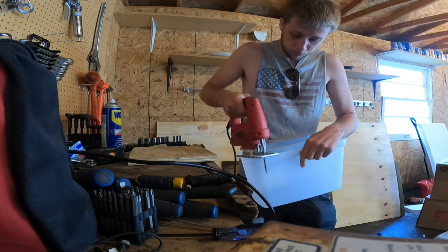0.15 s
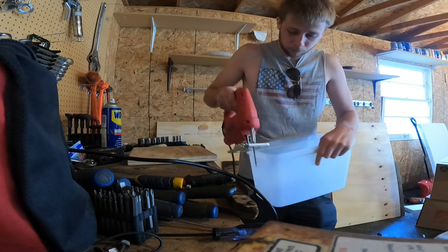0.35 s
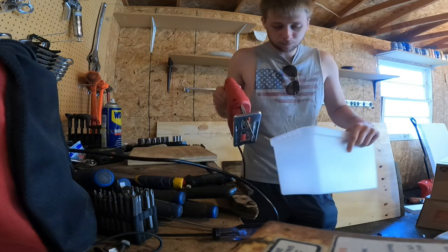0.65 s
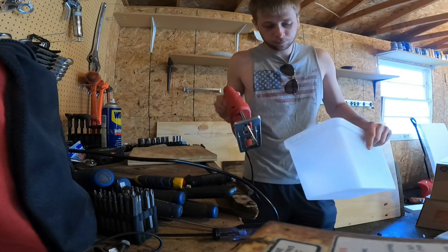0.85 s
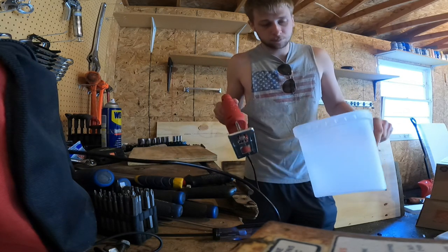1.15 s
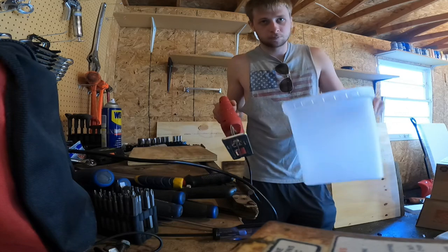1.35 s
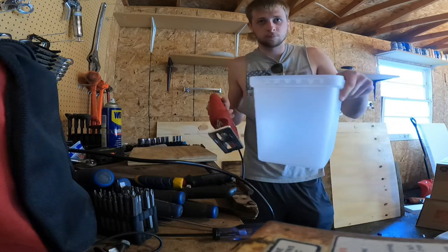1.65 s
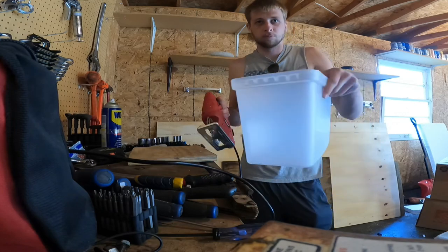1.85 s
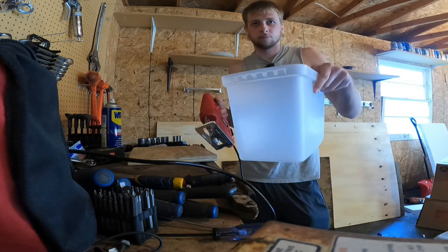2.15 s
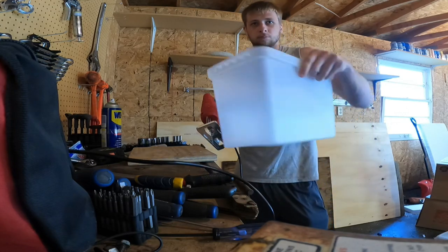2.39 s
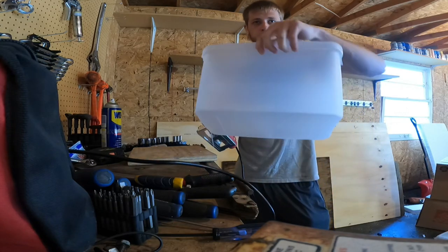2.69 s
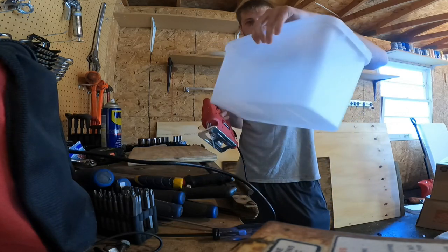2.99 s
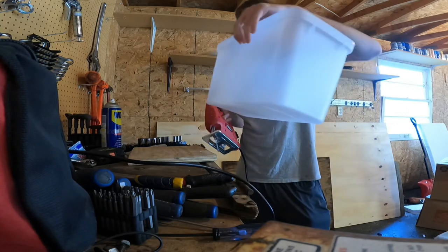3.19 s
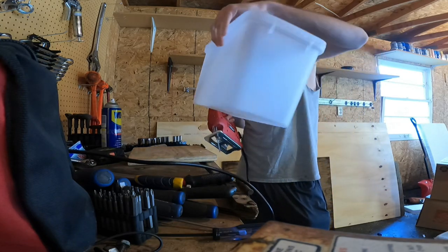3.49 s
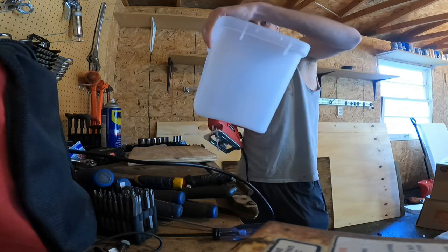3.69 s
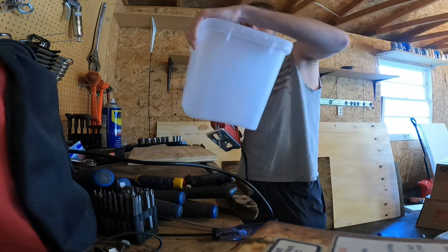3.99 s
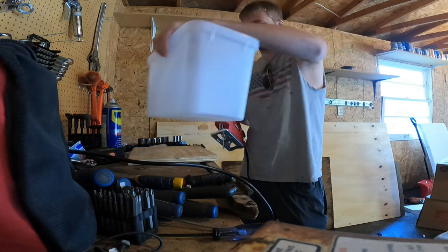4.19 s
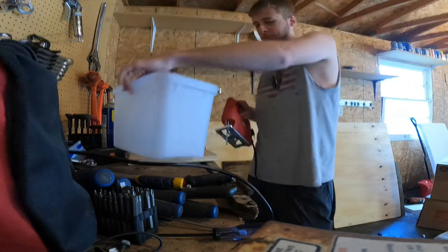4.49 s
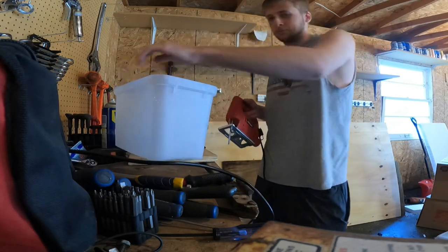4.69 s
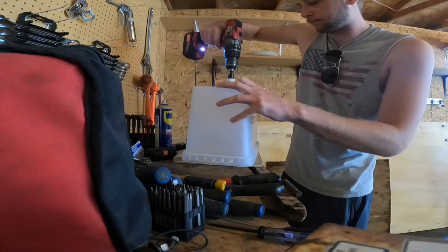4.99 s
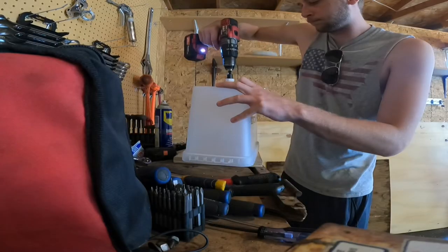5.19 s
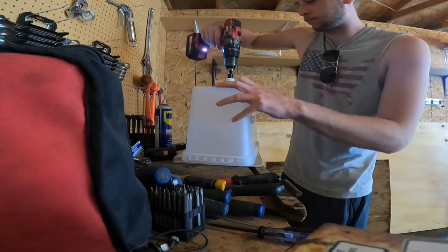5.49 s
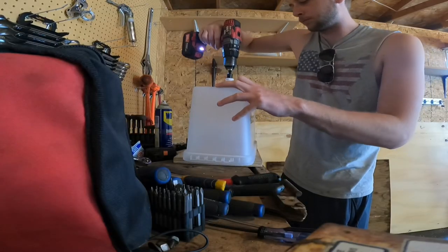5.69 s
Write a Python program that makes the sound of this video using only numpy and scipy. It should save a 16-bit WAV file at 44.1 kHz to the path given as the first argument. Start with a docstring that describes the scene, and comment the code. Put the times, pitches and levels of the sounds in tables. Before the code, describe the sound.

A jigsaw coasts down in a small wooden workshop, heard close in stereo. At 0 s two or three heavy hollow blows drum through a plastic bin as the loud, gritty whirr leaves it. The motor whine slides steadily downward, gear chatter thins and the tone darkens; from roughly 0.8 s loose metallic clacks stand out, slowing to irregular ticks from 1.5 to 1.9 s, with the motor gone by about 2.2 s. Low lumpy room rumble swells underneath. Hands brush the plastic around 2.5 s, with a sharp hollow knock at 2.7 s, then mostly quiet rustle. At 4.5 s the bin lands with a deep boom and smaller bumps. A tiny complete silence falls near 4.75 s. From 5 s come drill contact thumps, clicks and a brief thin whine near 4 kHz, then soft rubbing, small knocks, very faint higher tones and a last thump at 5.8 s.

```python
"""A jigsaw is lifted off a drumming plastic bin and coasts to a stop in a wooden workshop.
Its whirr is coloured noise with gear clicks and motor tones; its loose drive clacks as short dying tones.
The bin is turned over in the hand, knocked and set down: dying tones and noise for blows, hiss for rubbing.
After a short silence it is pressed under a drill, which thumps it and clicks; faint thin tones come and go.
Room tone made of low noise lies underneath, and random reflections make the workshop."""
import sys
import numpy as np
from scipy import signal
from scipy.fft import rfft, irfft
from scipy.io import wavfile
from scipy.ndimage import uniform_filter1d

SR = 44100
rng = np.random.default_rng(int(sys.argv[2]) if len(sys.argv) > 2 else 0)


def log_audio(samples):
    """Write samples as a 16-bit WAV file to the path given in sys.argv[1]."""
    # one column per channel
    frames = np.atleast_2d(samples).T
    # limit to full scale, then quantise
    limited = np.clip(frames, -1, 1)
    pcm = np.round(limited * 32767).astype(np.int16)
    wavfile.write(sys.argv[1], SR, pcm)


N = 257984  # length in samples

# The room. Room tone colour: (frequency [Hz], relative density [dB per Hz])
HUM_COLOUR = [(15, -38), (25, -1), (138, -4.5), (280, -16), (313, -17), (374, -16), (446, -19.5),
              (477, -32.5), (569, -31.5), (1060, -29.5), (2870, -46), (3590, -79.5), (5000, -60),
              (6500, -94), (11000, -120)]
# Room tone, low under the saw and swelling after: (time [s], level before HUM_LIFT_DB [dB])
HUM_LEVEL = [(0.35, -56), (1.94, -48.5), (2.54, -41.5), (3.08, -41.5), (4.18, -41), (5.04, -42.5),
             (5.85, -43)]
HUM_LIFT_DB = 8.0
# How alike left and right are made: (frequency [Hz], likeness [0-1])
LIKENESS = [(60, 1), (130, 0.99), (280, 0.99), (610, 0.86), (1310, 0.88), (2840, 0.47), (6140, 0.89),
            (13300, 0.39)]
# How long reflections last: (frequency [Hz], time to fall by 60 dB [s])
ROOM_DECAY = [(60, 0.77), (300, 0.48), (1000, 0.356), (4000, 0.26), (12000, 0.051)]
# The short silence: (start [s], end [s])
SILENCE = (4.733, 4.773)
EDGE_HZ = 13900  # upper band limit

# Hand and cable brushing over plastic:
# (full strength from [s], hold [s], treble level [dB], change below 1.5 kHz [dB])
RUB_STROKES = [(2.528, 0.014, -43, -16.5), (2.573, 0.22, -51.5, -15), (2.848, 0.037, -51.5, -2),
               (2.96, 0.22, -61.5, -18), (3.759, 0.072, -62.5, -15), (4.13, 0.054, -58, -17),
               (4.286, 0.2, -46, -21), (4.498, 0.14, -47, 2), (4.772, 0.054, -58, -6),
               (4.984, 0.027, -39.5, -12), (5.12, 0.2, -61, -8), (5.4, 0.64, -57, -8.5)]
# Colour of the brushing: (frequency [Hz], relative density [dB per Hz])
RUB_COLOUR = [(290, -45), (500, -30), (660, -19), (697, -12), (973, 14.5), (1650, 3.5), (1870, 0.5),
              (3160, -12.5), (5810, -14), (13700, -37)]
RUB_RISE_DB_PER_S, RUB_FALL_DB_PER_S = 237, 146
RUB_FROM_S, RUB_REST_DB, RUB_REST_LOW_DB = 2, -66, -9  # faint rustle between the strokes

# Thin, faint gliding tones: (start [s], length [s], from pitch [Hz], to pitch [Hz], from level [dB],
# to level [dB], octave against the tone [dB])
THIN_TONES = [(3.413, .16, 2900, 2880, -77, -75, -41), (4.903, 0.051, 4090, 4150, -51, -40, -8.5),
              (4.946, 0.061, 4150, 4020, -43.5, -37, -13), (5.008, 0.14, 4080, 4100, -60, -67, -20),
              (5.51, .1, 6920, 7350, -67, -78, -40), (5.628, 0.12, 8000, 7900, -56, -79, -42)]

# Blows on the bin: (time [s], bottom level [dB], bottom pitch [factor], walls level [dB],
# walls pitch [factor], ring length [factor], rattle level [dB], crack level [dB])
BLOWS = [(.0, -3.5, 1.05, -3, 1.066, 1.0, -33.5, -46), (0.071, -23, 1.5, -5.5, 0.94, 0.72, -24, -49.5),
         (.091, -2.5, 0.97, -3.5, 1.03, 0.79, -25, -41),
         (2.545, -49.5, 0.76, -29.5, 1.32, 0.94, -36.5, -68),
         (2.589, -49.5, 0.6, -30.5, 1.16, 0.96, -33.5, -71),
         (2.694, -0.5, .68, -10, 1.21, 0.28, -11.5, -14.5),
         (2.746, -32, 1.6, -24.5, 1.32, 0.87, -45, -74.5), (4.513, 2, 0.9, -7.5, 0.92, 0.71, -6.5, -20),
         (4.562, -13, 0.7, -9.5, .97, 1.2, -33.5, -67.5), (4.604, -16.5, 1.27, -14.5, 0.94, .9, -21, -47),
         (4.985, -8, 1.1, -9.5, 0.56, .4, -20.5, -43.5),
         (5.017, -37.5, 0.52, -10, 0.88, 0.84, -37.5, -43.5),
         (5.039, -48.5, 0.9, -13.5, 0.9, 0.42, -31, -29.5), (5.125, -18, .6, -40, .98, 1.2, -51, -63),
         (5.358, -37, 0.93, -23, 0.81, 1.3, -46.5, -61.5),
         (5.421, -22.5, 0.48, -19.5, 0.78, 0.62, -42.5, -63.5),
         (5.482, -54.5, 1.9, -34, 0.78, 0.54, -30.5, -35.5),
         (5.817, -8, 1.23, -20.5, 1.17, 0.45, -21, -32.5)]
# Slow heave of the whole bin, then its flat bottom, before the blow's factors:
# (pitch [Hz], relative level [dB], time to fall by 60 dB [s])
BOTTOM_MODES = [(59.3, -7.5, 0.3), (115.4, -2.5, 0.4)]
# Side walls, before the blow's factors: (pitch [Hz], relative level [dB], time to fall by 60 dB [s])
WALL_MODES = [(215.1, -8.5, 0.26), (302.2, 1, 0.2), (359, 1, 0.16), (469.6, -8.5, 0.19), (519, -16, .12),
              (945, -20.5, 0.044)]
# Dense upper tones of the bin: (frequency [Hz], relative density [dB per Hz])
RATTLE_COLOUR = [(150, -20.5), (300, 4), (600, 4.5), (1100, 1), (1800, -3), (3000, -22.5), (6000, -43),
                 (12000, -61.5)]
RATTLE_T60_S = 0.14  # time to fall by 60 dB, before the blow's ring length factor

# The loose blade drive. Last clacks as it stalls:
# (time [s], level [dB], pitch [Hz], treble tick against the clack [dB])
STALL_CLACKS = [(1.5446, -12.5, 3670, -8), (1.6298, -11.5, 3360, -23), (1.656, -17.5, 3730, -13),
                (1.694, -15, 3100, -7), (1.7992, -16, 3300, -8), (1.8532, -18.5, 2940, -4),
                (1.8966, -14, 3400, -12), (2.046, -48, 3770, -17), (2.0707, -29, 2800, 0)]
# Play taken up at set crank angles while the speed lies in a range, before random spread:
# (crank angle [0-1 of a stroke], from motor tone [Hz], down to motor tone [Hz],
# level [dB], pitch [Hz], treble tick against the clack [dB])
SLACK = [(.03, 6300, 3400, -7, 2950, -26), (.33, 6000, 2600, -18, 3500, -20),
         (.72, 4500, 2900, -12, 4000, -12)]
SLACK_FADE_DB_PER_KHZ, SLACK_SPREAD_DB, SLACK_SPREAD_PITCH = 16, 1.5, .04  # pitch spread is a fraction
# Tones of the blade holder: (multiple of the pitch [factor], relative level [dB])
HOLDER = [(1, 0), (1.13, -3), (1.27, -3.5), (1.55, -12)]
# Its treble tick: (frequency [Hz], relative level [dB])
TICK = [(7400, 0), (6100, -2), (11600, -14.5)]
CLACK_T60_S, HOUSING_HZ, HOUSING_DB = .007, 1450, -8

# The saw. Loudness of the whirr: (time [s], level [dB])
SAW_LEVEL = [(0.0, -14.5), (0.53, -15.5), (1.47, -23.5), (1.8, -26.5), (2.11, -44), (2.25, -73.5)]
# Whirr at full speed: (frequency [Hz], relative density [dB per Hz])
FAST_COLOUR = [(180, -43.5), (300, -11.5), (606, -12.5), (783, -7.5), (849, -9.5), (949, -3), (1250, -4),
               (1660, -3), (2080, -9), (2640, -11.5), (3000, -8), (3700, -10.5), (4410, -7.5),
               (12300, -34.5), (13700, -39.5)]
# Whirr near rest: (frequency [Hz], relative density [dB per Hz])
SLOW_COLOUR = [(180, -63.5), (300, -35), (363, -16), (470, -16), (723, -13), (796, -13.5), (905, -6),
               (1270, -6.5), (1440, -2.5), (2050, -11), (2960, -10), (4070, -14), (4480, -12.5),
               (6580, -16.5), (13700, -40.5)]
FAST_HZ, SLOW_HZ = 9000, 1500  # commutator tone at those two speeds
# Commutator partials 1-5 against the whirr, before the vents: (level [dB])
PARTIALS = [-10.5, -19., -17., -22., -17.]
# Where the tone escapes from the housing: (frequency [Hz], width [Hz], gain [dB])
VENTS = [(4780, 520, 4.), (5600, 300, -4.), (7400, 600, -6.), (8500, 350, -5.)]
# Housing rings woken as the speed passes by, before their throb:
# (frequency [Hz], width [Hz], lift [dB], commutator tone at the peak [Hz], span of that tone [Hz])
HOUSING_RINGS = [(805, 30, 9, 10200, 1300), (900, 70, 8, 6800, 1500), (1480, 70, 8, 2000, 1600)]
THROB_DB = 4  # the housing rings swell twice a stroke
# Commutator (the motor's contact ring) tone at 0 s, time constant of air drag,
# and bearing friction as a tone offset
START_HZ, DRAG_S, FRICTION_HZ = 11869, 2.0402, 6086
BARS, TEETH_PER_TURN, TURNS_PER_STROKE = 24, 5, 9.769  # per motor turn, except the last
CRANK_START = .31  # crank angle at 0 s in strokes


def amp(db):
    """Turns decibels into a gain."""
    return 10 ** (np.asarray(db) / 20)


def evened(x):
    """Scales to an average strength (rms) of 1."""
    return x / np.sqrt(np.mean(x ** 2) + 1e-20)


def read(points, hz):
    """Reads a table between its points, along a log-frequency axis."""
    f, value = np.transpose(points)
    return np.interp(np.log(hz + 1), np.log(f + 1), value)


def level_at(rows, t):
    """Reads a level curve at times t."""
    s, level_db = np.transpose(rows)
    return np.interp(t, s, level_db)


def add(mix, s, sound):
    """Mixes a sound in at s seconds."""
    part = mix[round(s * SR):][:len(sound)]
    part += sound[:len(part)]


def pair(x, size):
    """Spectra over time for left and right: x[0] is shared, x[1] is what differs."""
    hz, t, z = signal.stft(x, SR, nperseg=size, noverlap=size * 3 // 4)
    side = np.sqrt((1 - np.clip(read(LIKENESS, hz), 0, 1)) / 2)[:, None]
    shared = np.sqrt(1 - side ** 2) * z[0]
    return hz[:, None], t, np.array([shared + side * z[1], shared - side * z[1]])


def to_sound(z, size):
    """Turns spectra over time back into sound."""
    return signal.istft(z, nperseg=size, noverlap=size * 3 // 4)[1][:, :N]


def shaped(z, db, size):
    """Colours the spectra with a gain of unit power in each frame, then returns to sound."""
    gain = amp(db)
    gain = gain / np.sqrt(np.mean(gain ** 2, axis=0))
    return to_sound(z * gain, size)


def patches(shape, bins, frames):
    """Random unevenness of rms 1, smooth over frequency and time."""
    field = rng.standard_normal(shape[::-1]).T
    return evened(uniform_filter1d(uniform_filter1d(field, bins, 0), frames, 1))


def grains(per_s, spread_db):
    """Sparse clicks of uneven size and sign, rms 1."""
    draw = rng.random((3, N))
    size = amp(spread_db * np.minimum(-np.log(draw[0] + 1e-9), 4))
    return evened(size * np.sign(draw[1] - .5) * (draw[2] < per_s / SR))


def blurred_tone(hz, width, pure):
    """A tone that follows hz: a steady part, pure, plus a blur of that width in Hz."""
    r = np.exp(-np.pi * width / SR)
    noise = rng.standard_normal(len(hz)) + 1j * rng.standard_normal(len(hz))
    blur = signal.lfilter([1], [1, -r], noise)
    swing = pure + blur / np.sqrt(np.mean(abs(blur) ** 2))
    return evened((swing * np.exp(2j * np.pi * np.cumsum(hz) / SR)).real)


def hum():
    """Low, lumpy room tone: noise coloured unevenly."""
    hz, _, z = pair(rng.standard_normal((2, N)) * [[1], [1.5]], size=2048)
    sound = shaped(z, read(HUM_COLOUR, hz) + 2.0 * patches(z[0].shape, 5, 6), size=2048)
    return sound * amp(level_at(HUM_LEVEL, np.arange(N) / SR) + HUM_LIFT_DB)


def shop(x):
    """Sparse reflections of random sign, weak in the bass, each pitch range dying at its own speed."""
    taps = np.zeros((2, SR))
    at = np.arange(300, SR - 20, 20) + rng.integers(0, 20, (2, (SR - 301) // 20))
    np.put_along_axis(taps, at, rng.choice([-1., 1.], at.shape), 1)
    hz, t, z = pair(taps, size=512)
    less_bass = 1 / (1 + (170 / (hz + 1)) ** 3)
    tail = to_sound(z * amp(-60 * t / read(ROOM_DECAY, hz)) * less_bass, size=512)
    return signal.fftconvolve(x[None], tail / np.linalg.norm(tail[0]), axes=1)[:, :N]


def strokes_at(t):
    """Level and bass change of the strongest brushing stroke at times t."""
    s, hold, db, low_db = np.transpose(RUB_STROKES)[:, :, None]
    rise = RUB_RISE_DB_PER_S * np.maximum(s - t, 0)
    fall = RUB_FALL_DB_PER_S * np.maximum(t - s - hold, 0)
    level = np.vstack([db - rise - fall, RUB_REST_DB + 0 * t])
    return level.max(0), np.append(low_db, RUB_REST_LOW_DB)[level.argmax(0)]


def rub():
    """Skin and cable slide over plastic: hiss with fine grit."""
    grit = [[.5], [0]] * grains(500, spread_db=-1.5)
    hz, frames, z = pair(rng.standard_normal((2, N)) + grit, size=256)
    bass_db = uniform_filter1d(strokes_at(frames)[1], size=15) / (1 + (hz / 1500) ** 4)
    colour = read(RUB_COLOUR, hz) + bass_db + 2.7 * patches(z[0].shape, 4, 8)
    colour = colour - 10 * np.log10(np.mean(amp(colour[15:52]) ** 2, axis=0))  # level is held in the treble
    t = np.arange(N) / SR
    fade_in = np.clip((t - RUB_FROM_S) / 0.057, 0, 1)
    return to_sound(z * amp(colour), size=256) * amp(strokes_at(t)[0]) * fade_in


def thin_tones():
    """Thin, faint gliding tones: each is slightly blurred and has a softer octave."""
    out = np.zeros(N)
    for s, length, from_hz, to_hz, from_db, to_db, octave_db in THIN_TONES:
        u = np.arange(0, 1, 1 / SR / length)  # progress from 0 to 1
        hz = from_hz + (to_hz - from_hz) * u
        octave = amp(octave_db) * blurred_tone(2 * hz, width=260, pure=.3)
        sound = blurred_tone(hz, width=90, pure=1.1) + octave
        add(out, s, sound * amp(from_db + (to_db - from_db) * u) * signal.windows.tukey(len(u), .2))
    return out


def modes(table, t, pitch, decay, bend):
    """Dying tones, peak 1; the stretched plastic starts sharp by bend and relaxes."""
    time = t + bend * .012 * (1 - np.exp(-t / 0.014))
    ring = 0
    for hz, db, t60 in table:
        ring = ring + amp(db - 60 * t / (t60 * decay)) * np.sin(2 * np.pi * hz * pitch * time)
    ring = ring * np.sin(np.pi / 2 * np.minimum(t / 0.0048, 1)) ** 2  # soft start
    return ring / abs(ring).max()


def blows(rows):
    """The hollow bin drums in its bottom and walls; its dense upper tones rattle and a hard contact cracks."""
    out, t = np.zeros(N), np.arange(SR // 2) / SR
    hz = np.fft.rfftfreq(len(t), 1 / SR)
    # the drill rings as well
    chuck = 2.5 * np.sin(2 * np.pi * 1820 * t) + 0.96 * np.sin(2 * np.pi * 2900 * t)
    chuck = chuck * amp(-60 * t / 0.028)
    for s, base_db, base_pitch, wall_db, wall_pitch, ring, rattle_db, crack_db in rows:
        a, b = rfft(rng.standard_normal((2, len(t))))
        rattle = evened(irfft(a * amp(read(RATTLE_COLOUR, hz)), len(t)))
        rattle = rattle * amp(-60 * t / (RATTLE_T60_S * ring)) * np.minimum(t / 0.00056, 1)
        crack = evened(irfft(b / (1 + (hz / 4500) ** 4), len(t)))
        crack = crack * amp(-60 * t / 0.036) + chuck * (s > SILENCE[0])
        # pinned under the saw, the bin cannot heave
        table = BOTTOM_MODES[1:] if s < SAW_LEVEL[-1][0] else BOTTOM_MODES
        bottom = modes(table, t, base_pitch, ring, bend=1.1 * amp(5.5 * base_db))
        walls = modes(WALL_MODES, t, wall_pitch, ring, bend=0)
        drum = amp(base_db) * bottom + amp(wall_db) * walls
        add(out, s, drum + amp(rattle_db) * rattle + amp(crack_db) * crack)
    return out


def bin_in_shop(rows):
    """Blows, slightly different left and right, with their reflections."""
    knocks = blows(rows)
    side = 0.11 * signal.hilbert(knocks).imag  # a phase shift, equal level
    return knocks + side * [[1], [-1]] + shop(amp(-11.5) * knocks)


def motor_hz(t):
    """Commutator tone of the coasting motor, slowed by air drag and bearing friction."""
    return np.maximum((START_HZ + FRICTION_HZ) * np.exp(-t / DRAG_S) - FRICTION_HZ, 0)


def crank():
    """Strokes of the blade at every sample: motor turns geared down and added up."""
    return CRANK_START + np.cumsum(motor_hz(np.arange(N) / SR)) / SR / BARS / TURNS_PER_STROKE


def slack():
    """One clack per stroke at each crank angle, fading where the speed is out of its range."""
    rows, strokes = [], crank()
    for angle, from_hz, to_hz, db, hz, tick_db in SLACK:
        s = np.interp(np.arange(1, int(strokes[-1])) + angle, strokes, np.arange(N) / SR)
        speed = motor_hz(s)
        off_khz = np.maximum(np.maximum(speed - from_hz, to_hz - speed), 0) / 1000
        a, b = rng.standard_normal((len(s), 2)).T
        level = db - SLACK_FADE_DB_PER_KHZ * off_khz + SLACK_SPREAD_DB * a
        rows += zip(s, level, hz * (1 + SLACK_SPREAD_PITCH * b), tick_db + 0 * s)
    return rows


def clacks():
    """Each clack rings the steel holder for a few cycles and knocks the housing."""
    out, t = np.zeros(N), np.arange(600) / SR
    tick = sum(amp(db) * np.sin(2 * np.pi * f * t) for f, db in TICK)
    housing = amp(HOUSING_DB) * np.sin(2 * np.pi * HOUSING_HZ * t)
    for s, db, hz, tick_db in slack() + STALL_CLACKS:
        holder = sum(amp(m_db) * np.sin(2 * np.pi * m * hz * t) for m, m_db in HOLDER)
        ring = holder + housing + amp(tick_db) * tick
        add(out, s, amp(db - 60 * t / CLACK_T60_S) * ring * np.minimum(t / 0.00015, 1))
    return out


def motor_tones(tone_hz):
    """Multiples of the commutator tone, louder where the vents let them escape."""
    tones = 0
    for k, db in enumerate(PARTIALS, 1):
        partial_hz = np.minimum(k * tone_hz, SR / 3)
        escape = sum(amp(v_db) * np.exp(-((partial_hz - f) / width) ** 2) for f, width, v_db in VENTS)
        tones = tones + amp(db) * escape * blurred_tone(partial_hz, width=40, pure=2.0)
    return tones


def saw():
    """Fan air and gear chatter ring the housing; the colour darkens and the chatter thins as it slows."""
    t = np.arange(N) / SR
    tone_hz, strokes = motor_hz(t), crank()
    teeth = np.cumsum(tone_hz / BARS * TEETH_PER_TURN) / SR % 1
    puff = 1 + 1.0 * np.exp(-teeth / .3)  # each tooth meshing sharpens the hiss
    puff = puff * (1 + 0.1 * np.cos(4 * np.pi * strokes))  # the crank loads the gears twice a stroke
    air = rng.standard_normal((2, N)) * puff
    chatter = grains(.2 * tone_hz + 300, spread_db=3.0)
    hz, frames, z = pair(evened(air) + [[.3], [0]] * chatter, size=1024)
    speed = motor_hz(frames)
    fast = np.clip((speed - SLOW_HZ) / (FAST_HZ - SLOW_HZ), -.2, 1.2)  # 0 at slow, 1 at fast
    colour = fast * read(FAST_COLOUR, hz) + (1 - fast) * read(SLOW_COLOUR, hz)
    colour = colour + 2.0 * patches(z[0].shape, 9, 5)
    throb_db = THROB_DB * np.cos(4 * np.pi * (np.interp(frames, t, strokes) + .1))
    for f, width, db, at_hz, span in HOUSING_RINGS:
        nearness = np.exp(-((hz - f) / width) ** 2 - ((speed - at_hz) / span) ** 2)
        colour = colour + (db + throb_db) * nearness
    whirr = shaped(z, colour, size=1024) + motor_tones(tone_hz)
    running = np.clip((SAW_LEVEL[-1][0] - t) / 0.033, 0, 1)
    return amp(level_at(SAW_LEVEL, t)) * whirr * running


def scene():
    """All sources in the workshop; bin blows from before the silence do not ring on past it."""
    before = bin_in_shop([b for b in BLOWS if b[0] < SILENCE[0]])
    before = before * (np.arange(N) / SR < SILENCE[1])
    after = bin_in_shop([b for b in BLOWS if b[0] > SILENCE[0]])
    small = clacks() + thin_tones()
    return hum() + rub() + small + shop(amp(-12) * small) + before + after + saw()


def record(dry):
    """Mutes the short silence, limits the band, clips peaks beyond full scale and limits the band again."""
    t = np.arange(N) / SR
    heard = np.clip(np.maximum(SILENCE[0] - t, t - SILENCE[1]) * SR / 40, 0, 1)  # 40-sample fades
    low_pass = signal.firwin(255, EDGE_HZ, window=("kaiser", 9), fs=SR)[None]
    cut = signal.oaconvolve(dry * heard, low_pass, "same")
    return signal.oaconvolve(np.clip(cut, -1, 1), low_pass, "same")


dry = scene()
out = record(dry)
log_audio(out)
```